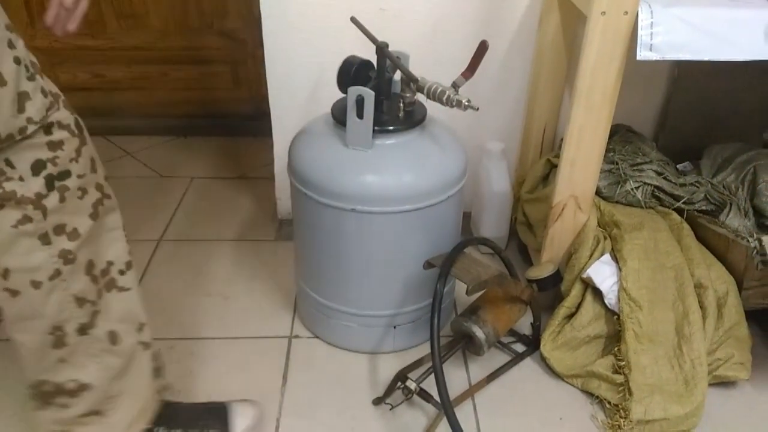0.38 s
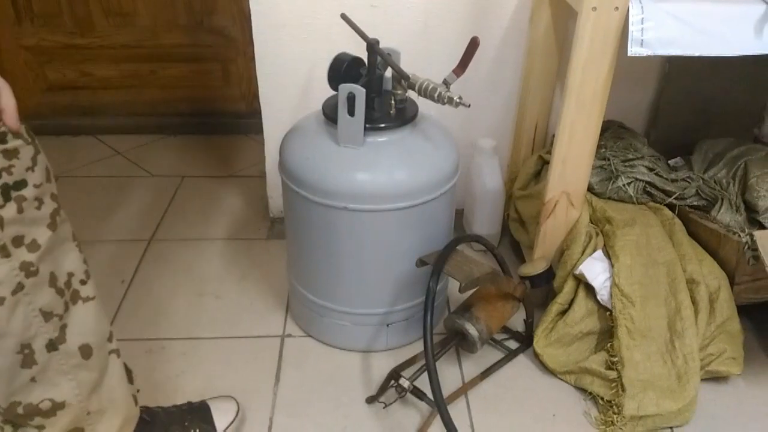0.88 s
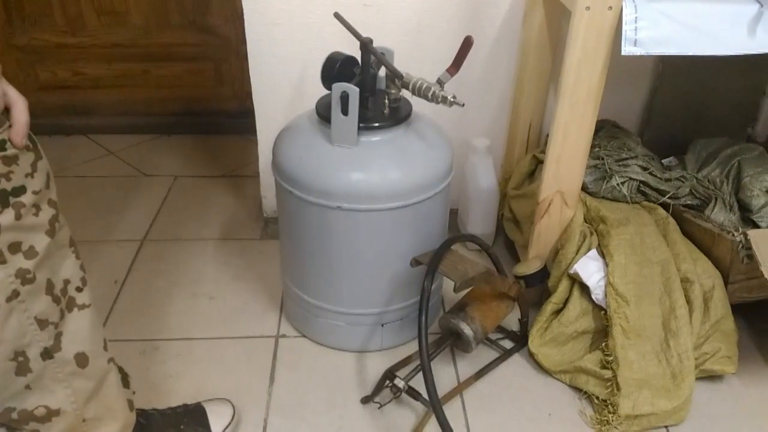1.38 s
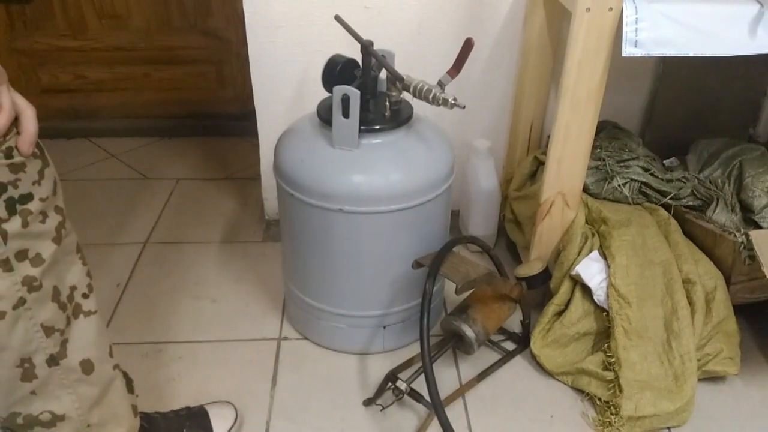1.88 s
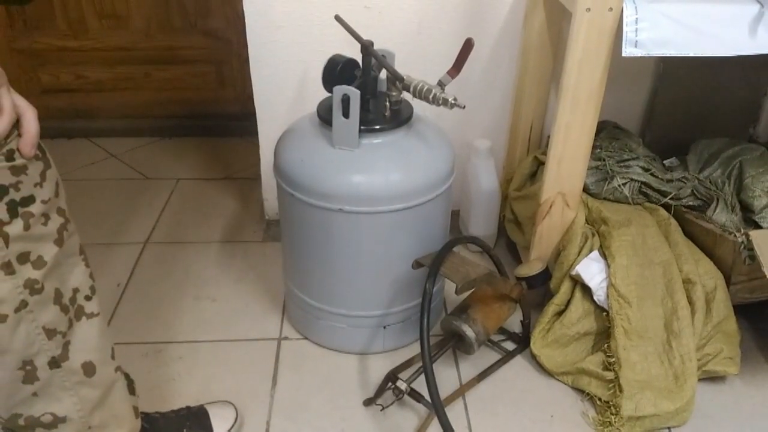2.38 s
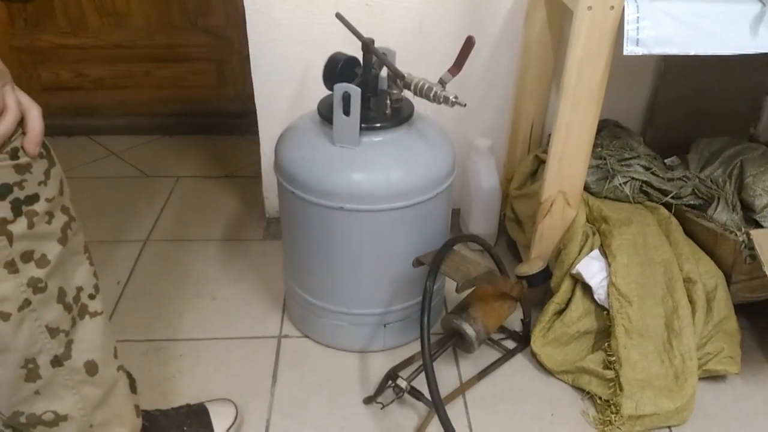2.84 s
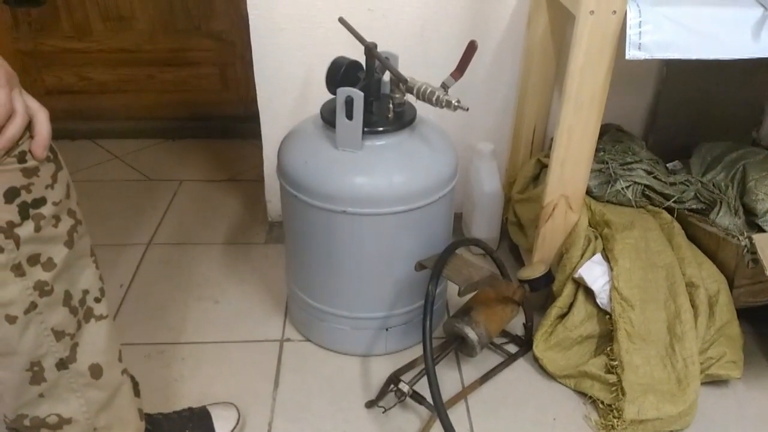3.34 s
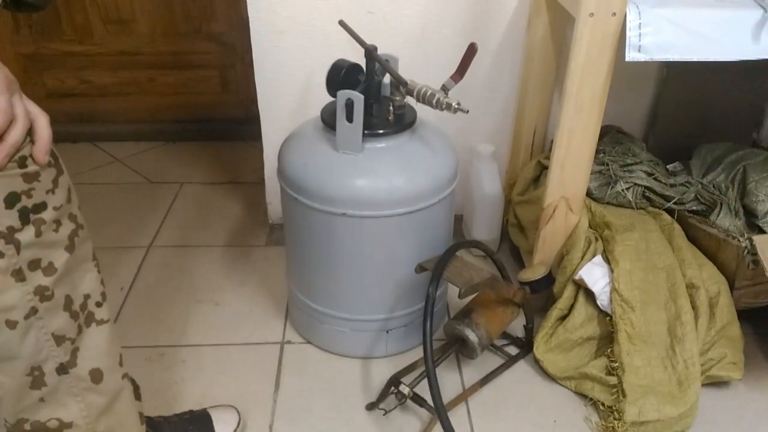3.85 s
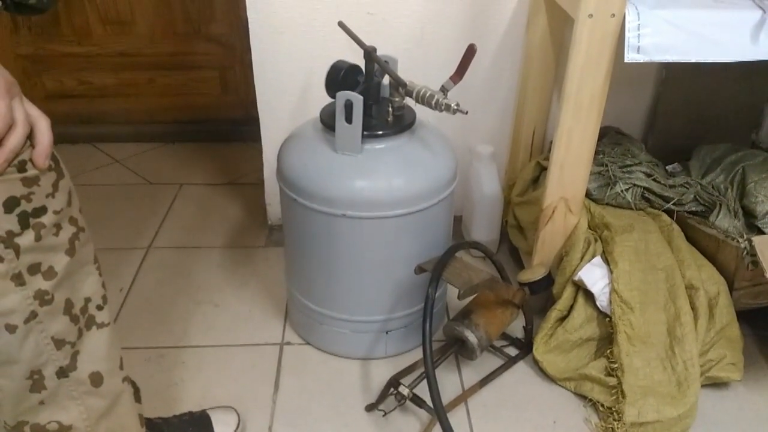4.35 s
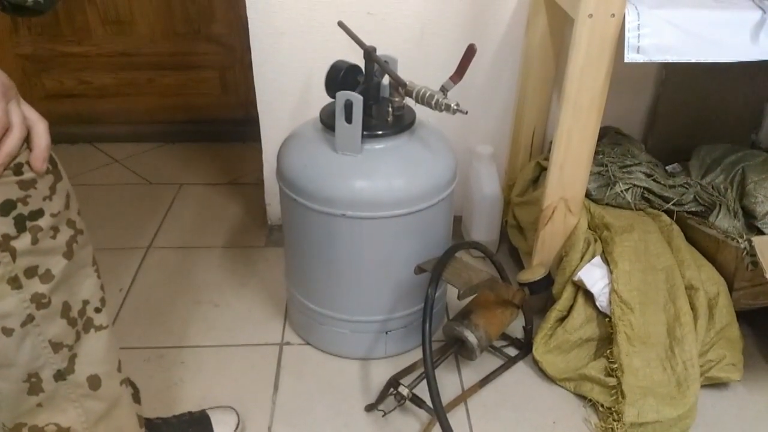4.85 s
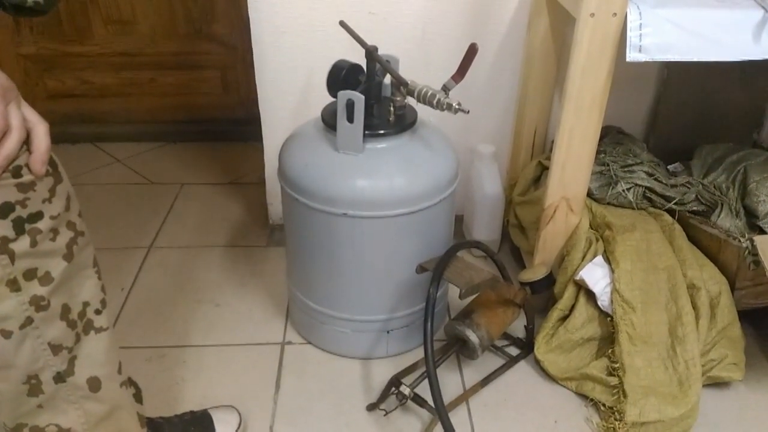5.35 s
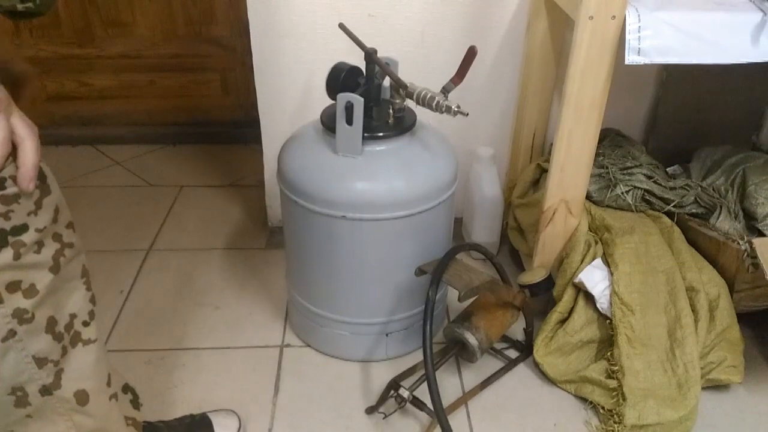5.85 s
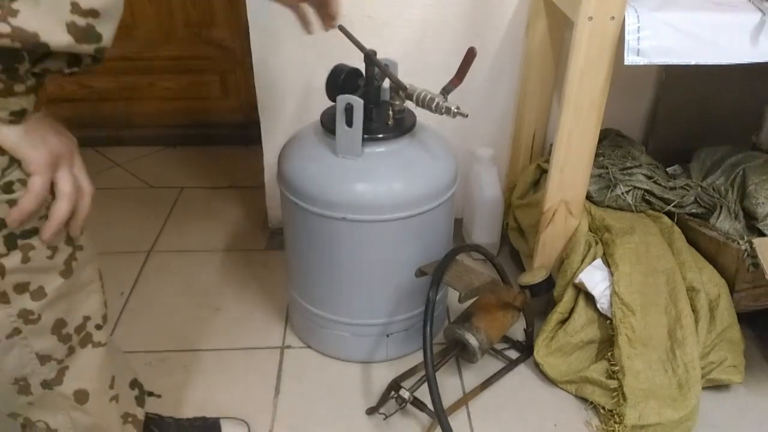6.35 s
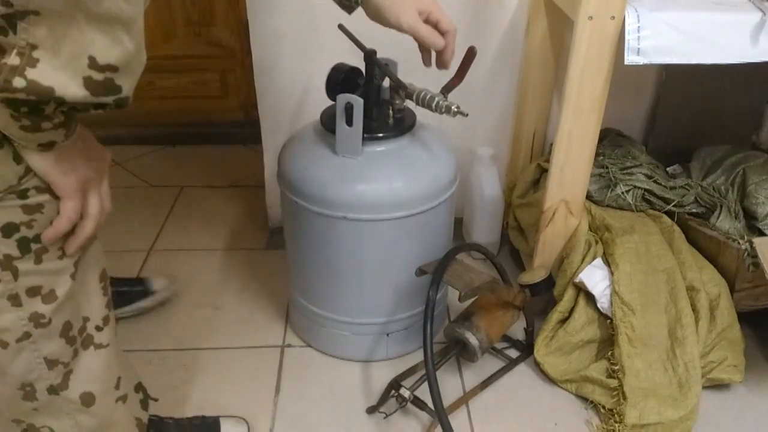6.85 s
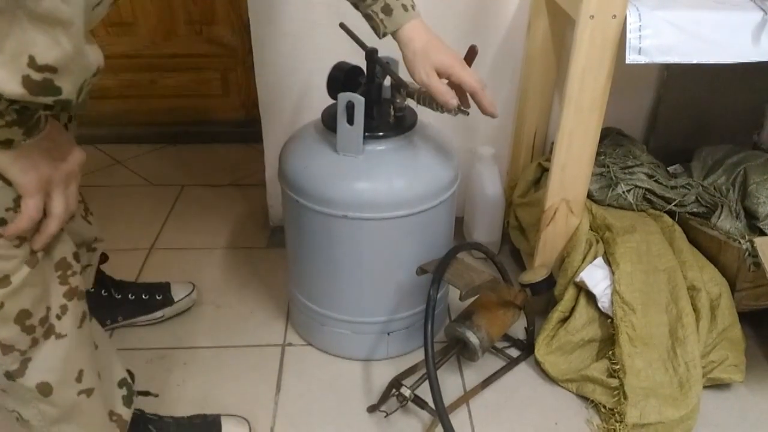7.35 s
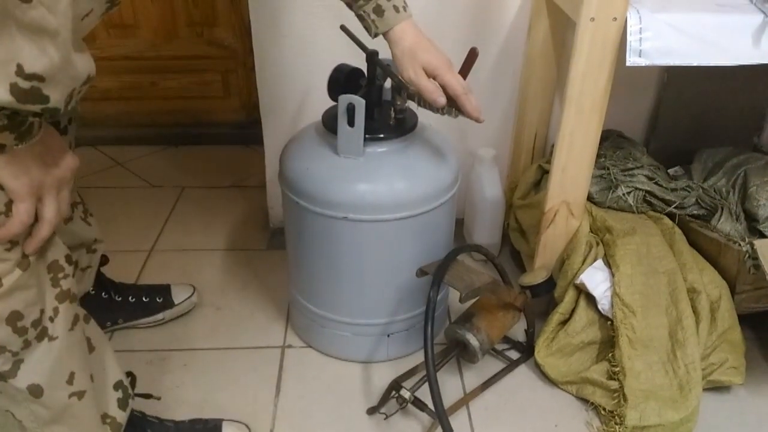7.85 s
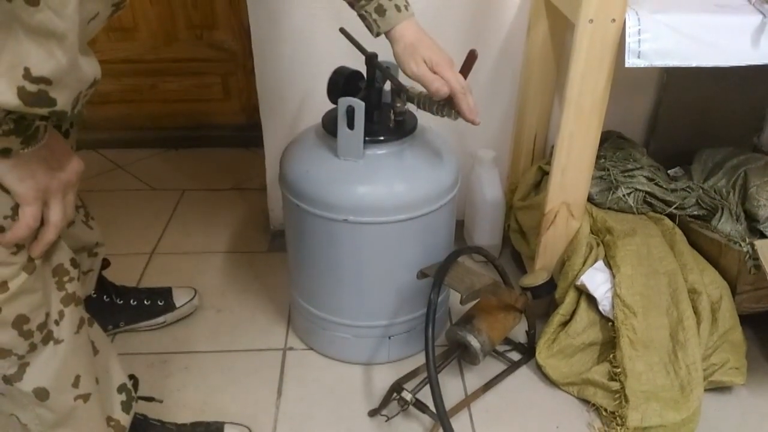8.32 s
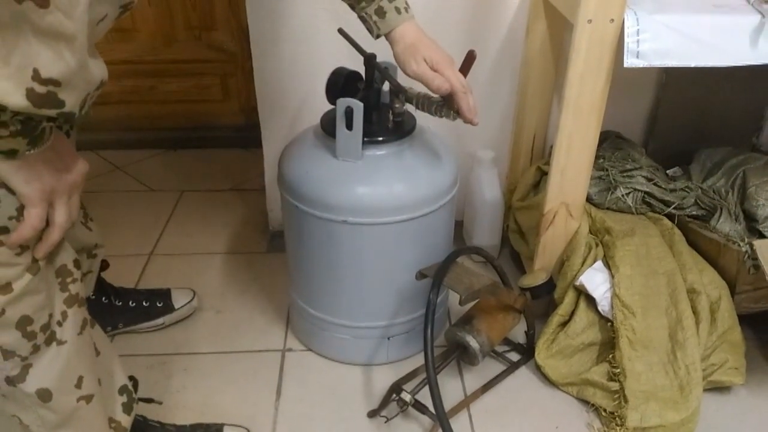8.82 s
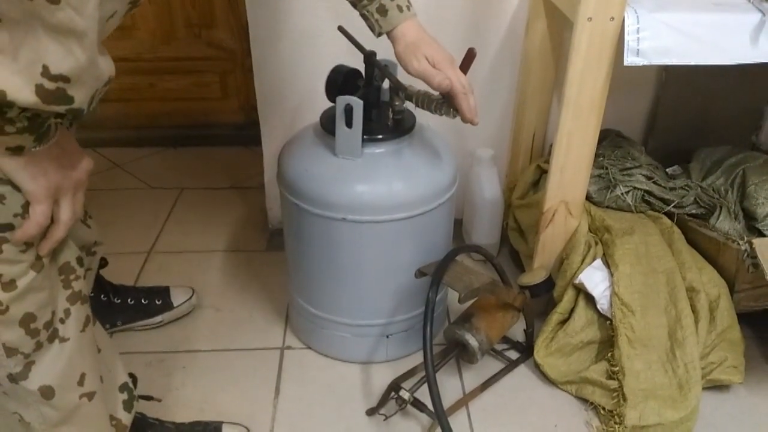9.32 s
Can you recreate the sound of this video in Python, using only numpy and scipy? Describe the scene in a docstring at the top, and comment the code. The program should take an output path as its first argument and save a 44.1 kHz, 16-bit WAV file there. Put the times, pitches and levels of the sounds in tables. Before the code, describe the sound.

A continuous, loud jet of air, strongest in a piercing upper-midrange band with very little bass. The crisp fizz on top fades over the first few seconds while the main hiss stays even. After about seven seconds a hand nears the outlet, altering the tone and bringing louder, sputtering bright bursts. Close mono pickup, short hard room reflections, barely noticeable mains hum beneath.

```python
"""Compressed air hisses out of the open valve of a steel tank in a small tiled room, over a faint mains hum.
The jet is random noise coloured by the valve, nearby echoes and the room. Its treble settles in steps early on,
while the low rush fades slowly throughout as the pressure sinks. After about seven seconds a hand nears the
outlet and deflects the jet: its colour changes and it swells, with uneven flares of treble until the end."""
import sys
import numpy as np
from scipy import signal
from scipy.fft import rfft, irfft, next_fast_len
from scipy.io import wavfile
from scipy.ndimage import uniform_filter1d

SR = 44100
rng = np.random.default_rng(int(sys.argv[2]) if len(sys.argv) > 2 else 0)


def bounce(signal):
    """Save signal as a 16-bit WAV file at the path given by the first command-line argument."""
    frames = np.transpose(np.atleast_2d(signal))
    limited = np.clip(frames, -1, 1)
    pcm = np.round(limited * 32767).astype(np.int16)
    wavfile.write(sys.argv[1], SR, pcm)


def ratio_of_db(decibels):
    """Turn decibels (scalar or array-like) into linear amplitude factors; 0 dB maps to 1."""
    return 10 ** (np.asarray(decibels, float) / 20)


N = 427769

# Broad colour of valve passage and microphone: free jet, hand nearing, jet against the hand.
# Each row: frequency in Hz, relative level in dB.
FREE_COLOUR = [(50, -68.6), (110, -48), (330, -41), (550, -35), (1500, -30.5), (2450, 0.5), (3100, -8),
               (3800, -21.5), (5500, -12.5), (7300, -26.5), (8300, -20), (10200, -12.5), (10800, -24),
               (14200, -31)]
NEARING_COLOUR = [(50, -66), (110, -56), (330, -42), (550, -30), (1500, -25.5), (2450, 0.5), (3100, -1),
                  (3800, -20), (5500, -9), (7300, -26), (8300, -15.5), (10200, -14.5), (10800, -24),
                  (14200, -32)]
CUPPED_COLOUR = [(50, -70), (110, -61), (330, -49), (550, -33), (1500, -25), (2450, 0), (3100, -3),
                 (3800, -19.5), (5500, -9), (7300, -22.5), (8300, -4.5), (10200, -8), (10800, -24),
                 (14200, -36)]
# Narrow peaks and dips from fittings, tank and room, for the same three states of the jet.
# Each row: centre in Hz, width in Hz, height in dB (negative for a dip).
FREE_PEAKS = [(560, 60, 5.7), (1217, 35, 4.4), (1493, 20, 6.7), (1648, 35, 5.7), (1860, 60, 1.2),
              (1960, 20, -5.7), (1993, 20, 4.9), (2020, 60, -11.0), (2067, 20, -3.0), (2140, 60, -8.2),
              (2187, 20, -4.5), (2280, 20, -4.3), (2580, 20, -4.4), (2605, 35, -10.5), (2663, 35, -9.0),
              (2800, 60, -9.1), (2847, 20, 4.2), (3020, 20, 6.0), (3193, 20, -4.5), (3223, 35, -6.1),
              (3253, 20, -5.5), (3340, 60, -6.9), (3413, 20, 3.4), (3538, 35, 4.2), (3640, 120, 2.8),
              (4280, 20, 6.4), (4313, 20, -4.5), (4420, 20, -9.2), (4600, 200, -8.4), (4728, 35, 5.7),
              (5107, 20, 5.4), (5247, 20, -4.2), (5293, 20, 5.4), (5498, 35, -5.8), (5567, 20, 8.7),
              (5713, 20, 7.0), (5790, 35, 7.1), (5980, 20, 5.0), (6035, 35, -8.9), (6360, 20, -7.2),
              (6840, 60, -5.3), (7248, 35, -7.2), (7482, 35, -6.8), (8020, 60, 5.4), (8400, 120, 8.0),
              (9520, 120, -4.2), (10025, 35, -8.8), (11717, 350, 4.1), (12760, 60, -6.1),
              (13267, 200, -6.0)]
NEARING_PEAKS = [(1100, 60, -8.7), (1800, 120, 6.0), (2120, 120, -4.6), (3240, 60, -8.8), (3340, 60, -7.2),
                 (3640, 120, 6.8), (3860, 60, 5.8), (4600, 200, -4.5), (5060, 60, 8.1), (5800, 200, 5.4),
                 (6140, 60, -7.0), (7720, 350, -10.0)]
CUPPED_PEAKS = [(1080, 60, -5.3), (1263, 35, 5.2), (1580, 20, -4.5), (1800, 120, 2.1), (1907, 20, 4.1),
                (1947, 20, -6.0), (2007, 20, -8.5), (2073, 20, -12.8), (2138, 35, -7.6), (2193, 20, -9.4),
                (2480, 60, 5.5), (2627, 20, -5.9), (2652, 35, -10.0), (2840, 120, -3.6), (2967, 20, -5.1),
                (3072, 35, 4.1), (3260, 60, -11.1), (3360, 60, -9.6), (3520, 20, 7.0), (3660, 60, 4.5),
                (3747, 20, -6.1), (4087, 20, -6.1), (4160, 60, 3.3), (4313, 20, -5.8), (4387, 20, 4.6),
                (4420, 20, -5.9), (4620, 20, -5.3), (4860, 20, -6.6), (5033, 20, 7.4), (5100, 60, 7.7),
                (5147, 20, 5.3), (5467, 20, -5.2), (5980, 20, 5.0), (6100, 20, -6.7), (6362, 35, -7.0),
                (6780, 120, -5.0), (7240, 120, 6.0), (7840, 120, -5.1), (10640, 120, -4.4),
                (11520, 60, 5.9), (11920, 120, 4.6)]
# Echoes from tank, wall and floor, for the free and the cupped jet.
# Each row: delay in milliseconds, strength as a fraction of the direct sound (negative is inverted).
FREE_ECHOES = [(1.587, 0.124), (2.2, 0.16), (4.422, -0.048), (4.785, 0.068), (5.941, 0.023), (7.37, 0.014),
               (7.982, 0.044), (12.086, 0.023), (14.694, 0.039), (15.76, 0.043)]
CUPPED_ECHOES = [(0.522, 0.069), (1.587, 0.065), (2.086, -0.064), (2.2, 0.036), (2.585, -0.073),
                 (5.941, 0.026), (6.735, 0.055), (7.347, 0.044)]
# How near the hand is. Each row: time in seconds, nearness from 0 (free) to 1 (cupped).
HAND_NEARNESS = [(0, 0), (6.9, 0), (7.25, 0.2), (7.58, 0.6), (7.66, 1), (9.7, 0.9)]
# Roar of the jet, nearly steady until the hand swells it.
# Each row: time in seconds, body level in dB, middle level in dB.
ROAR_LEVELS = [(0, -20, -24.5), (6.2, -19.5, -25.5), (7.2, -20, -26.3), (7.32, -18, -25),
               (7.47, -18, -26.5), (7.8, -17, -20.5), (8.0, -17, -22.5), (8.08, -18, -24.5),
               (8.26, -18, -22), (8.74, -19.5, -25.5), (8.86, -18.5, -23.5), (9.7, -19, -24)]
# Where the levels of rush, body, middle, treble and top hold. Each row: low edge in Hz, high edge in Hz.
RANGES = [(80, 280), (600, 3500), (4300, 6500), (7600, 10500), (10800, 14000)]
# Unsteady flow: one typical level swing in dB each for rush, body, middle, treble and top.
FLUTTER_DB = [1.7, 0.19, 0.18, 0.74, 0.43]
# Level of the treble fizz, settling in steps and flaring against the hand.
# Each row: time in seconds, level in dB.
TREBLE_LEVEL = [(0, -18.5), (.24, -18.2), (.38, -22.5), (.79, -23), (.9, -21.5), (1.21, -23), (1.3, -25.3),
                (1.7, -24), (2.0, -26.5), (3.0, -25.5), (3.45, -27.3), (7.25, -28), (7.36, -27),
                (7.57, -29), (7.74, -20.5), (8.02, -16.5), (8.16, -23), (8.36, -27), (8.83, -27.5),
                (8.94, -25), (9.03, -28), (9.19, -28), (9.34, -22), (9.52, -24.5), (9.7, -23)]
# Faint steady tones. Each row: frequency in Hz, rms level in dB.
HUM_TONES = [(43, -92), (200, -79), (300.5, -71)]

RUSH_START_DB, RUSH_FADE_DB_PER_S = -65.5, 0.6
# The top follows the treble above its quiet level, less closely once the jet hits the hand (dB per dB).
QUIET_TREBLE_DB, QUIET_TOP_DB = -28, -38
TOP_FOLLOWS_FREE, TOP_FOLLOWS_CUPPED = 1, 0.55


def jet():
    """Turbulent air noise in five overlapping ranges, passing from free through nearing to cupped colour."""
    size = next_fast_len(N)
    hz = np.fft.rfftfreq(size, 1 / SR)
    turbulence = rfft(rng.standard_normal(size))
    free = colour(hz, FREE_COLOUR, FREE_PEAKS, FREE_ECHOES, ripple_db=2.5, ripple_hz=9.0)
    nearing = colour(hz, NEARING_COLOUR, NEARING_PEAKS, [], ripple_db=2.5, ripple_hz=16)
    cupped = colour(hz, CUPPED_COLOUR, CUPPED_PEAKS, CUPPED_ECHOES, ripple_db=2.8, ripple_hz=14)
    nearness = curves(HAND_NEARNESS)[0]
    # the nearing colour is strongest at nearness 0.5
    blend = [np.clip(1 - abs(2 * nearness - state), 0, 1) for state in range(3)]
    shared_gust = wander(N, SR / 24)
    out = np.zeros(N)
    for k, (level_db, (low, high)) in enumerate(zip(jet_levels(nearness), RANGES)):
        # full inside its own range, sloping to nothing at the neighbouring ones
        is_this_range = np.arange(len(RANGES)) == k
        share = np.interp(hz, np.ravel(RANGES), np.repeat(is_this_range, 2))
        inside = (hz > low) & (hz < high)
        hiss = np.zeros(N)
        for weight, gain in zip(blend, (free, nearing, cupped)):
            # scale each colour so that the noise inside the range has rms 1
            strength = np.sqrt((gain[inside] ** 2).sum() / len(hz))
            hiss += weight * irfft(turbulence * share * gain / strength, size)[:N]
        # a little of the flutter is common to all ranges, most is each range's own
        flutter = 0.28 * shared_gust + 0.95 * wander(N, SR / 30)
        out += ratio_of_db(level_db + FLUTTER_DB[k] * flutter) * hiss
    return out


def jet_levels(nearness):
    """Levels in dB of rush, body, middle, treble and top; the rush fades as the pressure sinks."""
    rush_db = RUSH_START_DB - RUSH_FADE_DB_PER_S * np.arange(N) / SR
    body_db, middle_db = curves(ROAR_LEVELS)
    treble_db = curves(TREBLE_LEVEL)[0]
    follows = TOP_FOLLOWS_FREE + (TOP_FOLLOWS_CUPPED - TOP_FOLLOWS_FREE) * nearness
    top_db = QUIET_TOP_DB + follows * (treble_db - QUIET_TREBLE_DB)
    return [rush_db, body_db, middle_db, treble_db, top_db]


def colour(hz, broad, peaks, echoes, ripple_db, ripple_hz):
    """Gain from outlet to microphone: broad shape, peaks and dips, late reflections, echoes."""
    shape_hz, shape_db = np.transpose(broad)
    db = np.interp(np.log(hz + 1), np.log(shape_hz), shape_db)
    for centre, width, peak_db in peaks:
        db = db + peak_db / (1 + (2 * (hz - centre) / width) ** 2)
    # room modes crowd into a fine ripple only higher up
    crowded = hz ** 2 / (hz ** 2 + 1200 ** 2)
    db = db + ripple_db * crowded * wander(len(hz), ripple_hz / hz[1])
    gain = ratio_of_db(db)
    for delay_ms, strength in echoes:
        # a delayed copy strengthens some frequencies and weakens others
        gain = gain * abs(1 + strength * np.exp(-2j * np.pi * hz * delay_ms * 1e-3))
    return gain


def wander(size, span):
    """Smooth random line of average 0 and rms 1 that changes over span points."""
    span = max(int(span), 1)
    line = uniform_filter1d(rng.standard_normal(size), span)
    line = uniform_filter1d(line, span)
    return (line - line.mean()) / line.std()


def curves(rows):
    """Draws straight lines between the rows of a timed table, one curve for each value column."""
    seconds, *columns = np.transpose(rows)
    return [np.interp(np.arange(N) / SR, seconds, column) for column in columns]


def hum():
    """Faint steady mains hum: a few pure sine tones that never change."""
    t = np.arange(N) / SR
    # a sine peaks at root two times its rms level
    return sum(np.sqrt(2) * ratio_of_db(db) * np.sin(2 * np.pi * hz * t) for hz, db in HUM_TONES)


def scene():
    """Jet and hum together, on one channel."""
    return (jet() + hum())[None]


def top_cut(x):
    """Nothing passes above the cut-off."""
    return signal.sosfilt(signal.butter(12, 14200, fs=SR, output="sos"), x)


def record(dry):
    """Turns the finished mix into the sound that is saved."""
    return top_cut(dry)


dry = scene()
out = record(dry)
bounce(out)
```